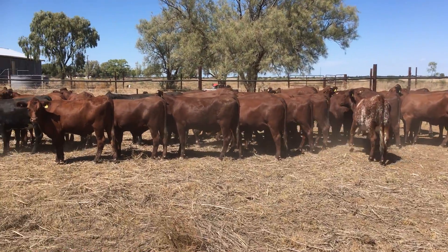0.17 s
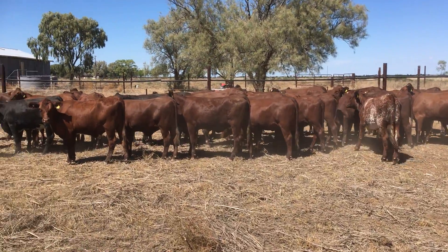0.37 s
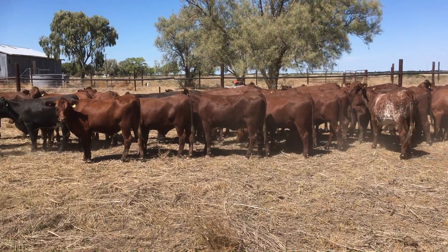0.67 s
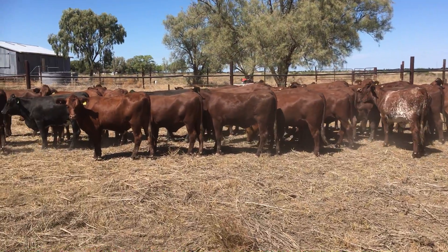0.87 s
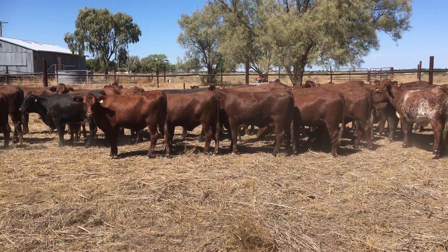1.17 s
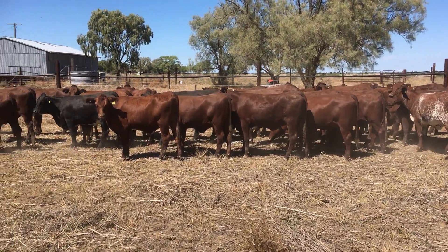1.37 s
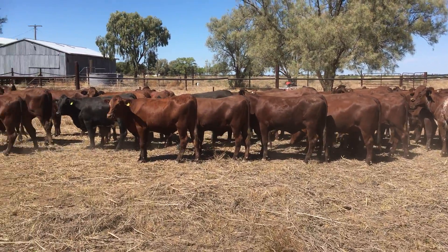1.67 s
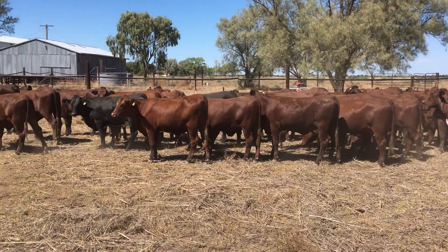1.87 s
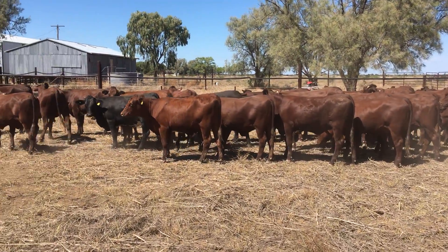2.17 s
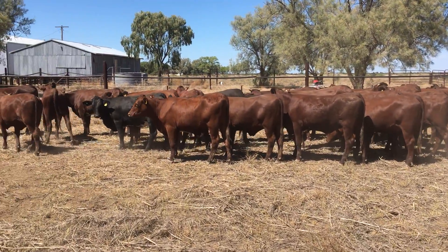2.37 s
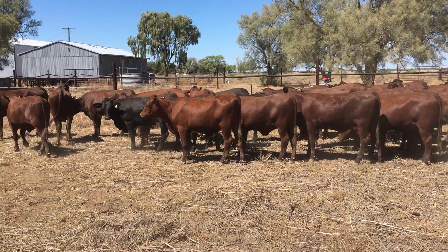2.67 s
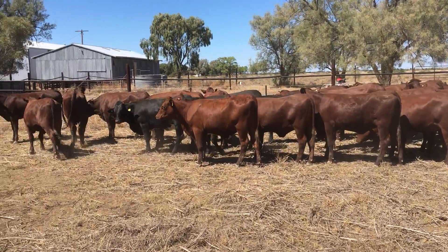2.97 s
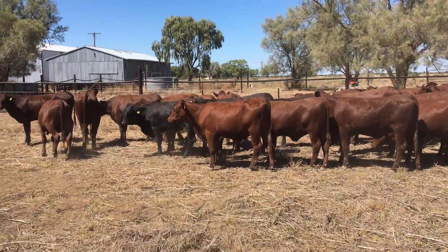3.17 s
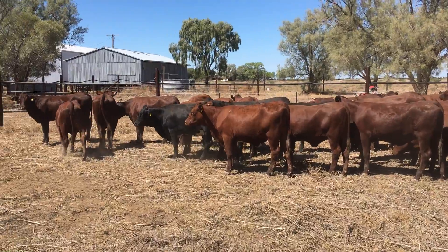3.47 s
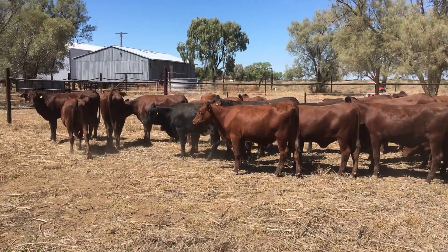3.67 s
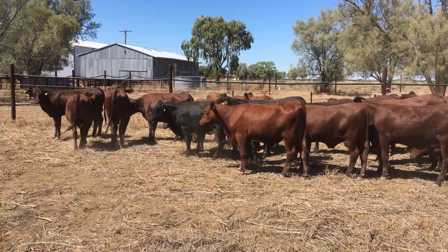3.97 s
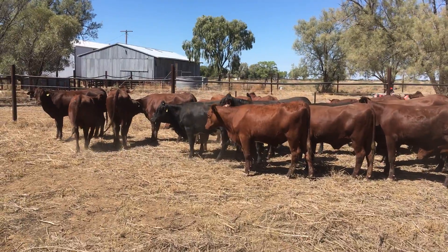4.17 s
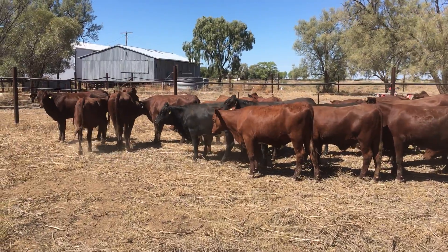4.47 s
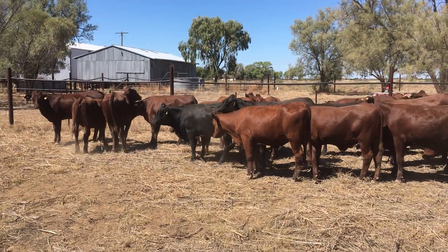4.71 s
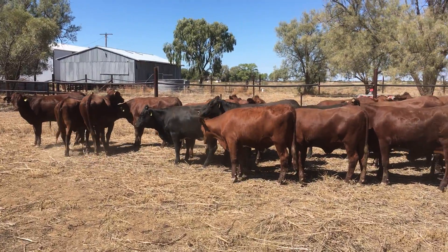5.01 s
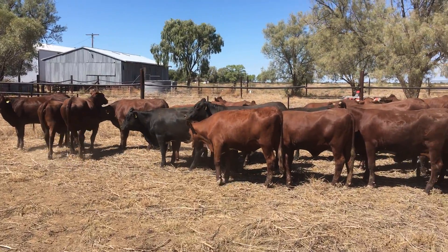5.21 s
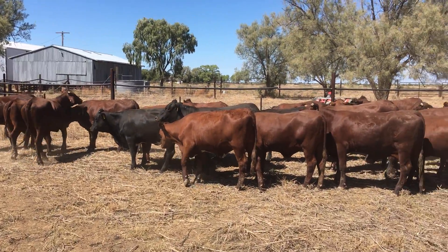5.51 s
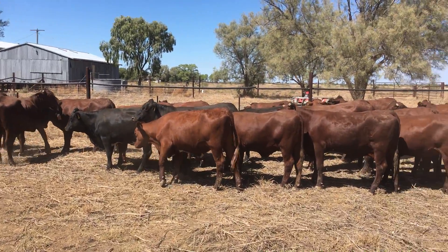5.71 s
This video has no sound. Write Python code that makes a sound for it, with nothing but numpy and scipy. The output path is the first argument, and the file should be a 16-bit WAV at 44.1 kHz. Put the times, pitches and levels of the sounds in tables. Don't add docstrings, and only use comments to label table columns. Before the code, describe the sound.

Dry straw crunches and crackles under shuffling feet and hooves in an open cattle yard, with sharp snaps, faint thuds and low wind rumble.

```python
import sys
import numpy as np
from scipy import signal
from scipy.fft import rfft, irfft, next_fast_len
from scipy.io import wavfile
from scipy.ndimage import uniform_filter1d, map_coordinates

SR = 44100
rng = np.random.default_rng(int(sys.argv[2]) if len(sys.argv) > 2 else 0)


def ratio(d):
    e = np.asarray(d, float) / 20
    return 10 ** e


def wav_out(sig):
    wavfile.write(sys.argv[1], SR, np.round(np.clip(np.atleast_2d(sig).T, -1, 1) * 32767).astype(np.int16))


N = 257974

# time of the peak in seconds, peak level in dB, pitch in Hz.
HOOF_THUDS = [(0.082, -41.5, 260), (0.45, -43.5, 290), (1.06, -50, 250), (1.36, -49, 170),
              (2.105, -44.5, 220), (2.223, -46, 268), (2.42, -41, 201), (2.483, -43, 214),
              (2.626, -48, 176), (2.887, -48.5, 205), (3.26, -47, 230), (3.403, -45.5, 290),
              (3.67, -50, 250), (4.12, -51, 200), (4.8, -50, 250), (5.38, -46.5, 150), (3.496, -48.5, 325),
              (5.113, -44, 190), (5.278, -47, 219), (5.594, -46, 163), (5.797, -58, 180)]
# time in seconds, chaff level in dB.
HERD_MILLING = [(0.0, -66.5), (2.04, -67.5), (2.18, -65.5), (2.43, -60.5), (2.56, -67), (3.11, -68.5),
                (3.32, -64), (3.73, -71), (4.27, -65), (4.59, -70.5), (5.08, -68.5), (5.85, -72)]


def unit(x):
    return x / np.sqrt(np.mean(x ** 2) + 1e-20)


def herd_level():
    s, db = np.transpose(HERD_MILLING)
    return np.interp(np.arange(N) / SR, s, db)


def wobble(rate):
    knots = rng.standard_normal(int(N * rate / SR) + 4)
    return map_coordinates(knots, [np.arange(N) * rate / SR])


def coloured(x, spectrum):
    m = next_fast_len(N + 8192)
    f, db = np.transpose(spectrum)
    gain = ratio(np.interp(np.log(np.fft.rfftfreq(m, 1 / SR) + 1), np.log(f), db, -120, -120))
    return unit(irfft(rfft(x, m) * gain, m)[:N])


def placed(s, waves):
    first = np.clip(np.round(s * SR).astype(int), 0, N)
    at = first[:, None] + np.arange(waves.shape[1])
    return np.bincount(at.ravel(), waves.ravel(), N + waves.shape[1] + 1)[:N]


def swells(s, db, rise_s, fall_s, floor_db):
    pointed = 1.9
    grid = np.arange(0, N + 64, 64)
    late = grid / SR - s[:, None]
    side_s = np.where(late < 0, rise_s[:, None], fall_s[:, None])
    bells = db[:, None] - 10 * np.abs(late / side_s) ** pointed
    total_db = 10 * np.log10(ratio(2 * bells).sum(axis=0) + ratio(2 * floor_db))
    return np.interp(np.arange(N), grid, total_db)


def hoof_falls(over_db):
    thud_s = 0.037
    s, db, _ = np.transpose(HOOF_THUDS)
    return ratio(swells(s, db + over_db, thud_s / 2 + 0 * s, thud_s + 0 * s, -120))


def clean_breaks(count, spread_db):
    u = rng.random((count, 3))
    side = np.sign(u[:, 1:2] - 0.5)
    return unit(placed(u[:, 0] * N / SR, side * ratio(-spread_db * np.log(u[:, 2:] + 0.013))))


def breaks(s, db, hz, cycles, size):
    turns = hz[:, None] * np.arange(size) / SR
    swing = np.sin(2 * np.pi * turns) * np.exp(-turns / cycles)
    return placed(s, ratio(db)[:, None] * swing)


def crackle(count, size, low_hz, high_hz, cycles, spread_db, clump_db, hiss_db, ticks, spectrum):
    u = rng.random((count, 3))
    hz = low_hz + (high_hz - low_hz) * u[:, 1]
    db = -spread_db * np.log(u[:, 2] + 6e-3)
    grains = breaks(u[:, 0] * N / SR, db, hz, cycles, size)
    grains = np.diff(grains, prepend=0) * ratio(clump_db * wobble(45))
    hiss = ratio(hiss_db) * rng.standard_normal(N)
    return coloured(unit(grains) + hiss + ticks, spectrum)


def straw():
    # time of most weight in seconds, fine stems level in dB,
    # release to -10 dB in seconds, thick stems over fine ones in dB.
    steps = [(0.047, -49.5, 0.3, -8), (0.245, -40, 0.13, -20), (0.441, -44, 0.08, -18),
             (0.595, -47, 0.39, -12.5), (0.716, -37.0, 0.014, -17.5), (0.895, -46, 0.2, -14.5),
             (1.101, -41.5, 0.07, -14.5), (1.224, -40.5, 0.0554, -21.5), (1.356, -45.5, 0.06, -17),
             (1.599, -46, 0.296, -15), (1.832, -51.5, 0.12, -18), (2.103, -44.5, 0.13, -13),
             (2.242, -43, 0.08, -18), (2.46, -45.5, 0.1153, -13.5), (2.589, -44.5, 0.04, -15.5),
             (2.69, -45.5, 0.05, -20), (2.846, -45.5, 0.11, -13), (3.273, -43, 0.16, -14.5),
             (3.535, -51.5, 0.07, -15), (3.69, -54, 0.57, -11.5), (4.073, -41, 0.106, -17),
             (4.39, -54, 0.14, -15), (4.546, -49.5, 0.031, -8.5), (4.774, -51.5, 0.08, -16.5),
             (4.919, -44, 0.063, -14.5), (5.163, -54, 0.14, -12), (5.32, -42.5, 0.061, -22),
             (5.459, -45.5, 0.033, -11.5), (5.536, -55.5, 0.2, -13), (5.832, -47.5, 0.113, -17.5)]
    # time of the peak in seconds, thick stems level in dB,
    # release to -10 dB in seconds.
    scuffs = [(0.075, -60, 0.08), (1.122, -60, .025), (2.085, -57.5, 0.12), (2.78, -55, -0.03),
              (3.225, -59, 0), (3.665, -65, .03), (4.075, -62, .04), (4.705, -63, .04), (4.8, -64, 0.3),
              (4.885, -60, .07), (5.09, -62, .03), (5.17, -64, 0), (5.43, -57, .045), (5.525, -62.5, 0.06)]
    # frequency in Hz, density in dB per Hz.
    fine_tone = [(3500, -18), (4900, -11), (6000, -3.5), (7700, -5.5), (9000, -1.5), (10300, -4),
                 (11500, -1.5), (16500, -1.5)]
    # frequency in Hz, density in dB per Hz.
    thick_tone = [(1200, -6), (2000, -2), (3200, -0.5), (4500, -3.5), (6000, -14.5), (9000, -1)]
    # frequency in Hz, density in dB per Hz.
    chaff_tone = [(200, -32), (400, -1), (1000, -0.5), (1800, -8), (2600, -15), (4000, -50)]
    press_over_release = 1.39
    catch_s, scuff_fine_db = 0.0075, 9
    far_fine_db, far_thick_db = -57, -68.5
    chaff_step_db, chaff_follows = -70, 0.7

    step_s, step_db, release_s, weight_db = np.transpose(steps)
    scuff_s, scuff_db, drag_s = np.transpose(scuffs)
    s = np.r_[step_s, scuff_s]
    rise_s = np.r_[press_over_release * release_s, catch_s + 0 * drag_s]
    fall_s = np.r_[release_s, drag_s]
    fine_db = swells(s, np.r_[step_db, scuff_db + scuff_fine_db], rise_s, fall_s, far_fine_db)
    thick_db = swells(s, np.r_[step_db + weight_db, scuff_db], rise_s, fall_s, far_thick_db)

    step_chaff = ratio(chaff_step_db + chaff_follows * (thick_db + 60.5))
    chaff_gain = np.hypot(ratio(herd_level() - 1.5), step_chaff)
    chaff_gain = np.hypot(chaff_gain, hoof_falls(-18))

    shuffle, scuff = wobble(24.524), wobble(15)
    ticks = clean_breaks(count=1500, spread_db=5.0)
    fine = crackle(count=24000, size=48, low_hz=5160, high_hz=17000, cycles=2.8, spread_db=4.0,
                   clump_db=2.5, hiss_db=1.0, ticks=ratio(-7.5) * ticks, spectrum=fine_tone)
    thick = crackle(count=9000, size=96, low_hz=2386, high_hz=7130, cycles=2.4, spread_db=3.0,
                    clump_db=0.7, hiss_db=2.0, ticks=ratio(-11) * ticks, spectrum=thick_tone)
    chaff = crackle(count=3000, size=256, low_hz=824, high_hz=3440, cycles=1.4, spread_db=3.0,
                    clump_db=2.8, hiss_db=7.5, ticks=ratio(3.5) * ticks, spectrum=chaff_tone)
    fine = ratio(fine_db + 0.5 + 0.49 * shuffle + 0.4 * scuff) * fine
    thick = ratio(thick_db + 1.15 * shuffle + 0.33 * scuff) * thick
    chaff = chaff_gain * ratio(0.8 * shuffle + 0.83 * scuff) * chaff
    return fine + thick + chaff


def wind():
    # time in seconds, rumble level in dB, length to -10 dB in seconds.
    gusts = [(0.126, -58.5, 0.125), (0.298, -63.0, -0.2), (0.587, -56.5, 0.06), (0.743, -52, 0.04),
             (0.93, -57.5, 0.104), (1.111, -59, 0.041), (1.43, -61, 0.06), (1.681, -59, 0.062),
             (1.823, -55, 0.07), (2.075, -64.5, 0.4), (2.449, -60.5, 0.103), (2.57, -55, 0.04),
             (2.66, -58, 0.105), (3.213, -62.5, 0.04), (3.725, -64.5, 0.2), (3.927, -62.3, 0.1),
             (4.122, -58, 0.045), (4.371, -61.5, 0.222), (4.708, -66, 0.1), (4.991, -67, 0.151),
             (5.15, -58.5, 0.15), (5.331, -64.3, 0.05), (5.602, -61, 0.1), (5.775, -62.5, 0.2)]
    # frequency in Hz, density in dB per Hz.
    rumble_tone = [(15, -46), (30, -5.5), (48, -0.5), (75, -0.5), (110, -9.5), (180, -21)]
    # frequency in Hz, density in dB per Hz.
    flutter_tone = [(60, -22), (110, 0), (170, -0.5), (300, -6.5), (450, -15.5), (700, -30)]
    calm_db = -71
    s, db, length_s = np.transpose(gusts)
    rumble_db = swells(s, db, length_s, length_s, calm_db)
    herd_db = herd_level()
    flutter_db = -65.5 + 0.57 * (herd_db - herd_db.mean())
    rumble = unit(ratio(0.9 * wobble(13)) * coloured(rng.standard_normal(N), rumble_tone))
    flutter = unit(ratio(2.45 * wobble(25)) * coloured(rng.standard_normal(N), flutter_tone))
    flutter_gain = np.hypot(ratio(flutter_db), hoof_falls(-16.5))
    return ratio(rumble_db + 0.2) * rumble + flutter_gain * flutter


def thuds():
    s, db, hz = np.transpose(HOOF_THUDS)[:, :, None]
    turns = hz * np.arange(1200) / SR
    swing = turns * np.exp(-turns / 0.58) * np.sin(2 * np.pi * turns)
    return placed(s[:, 0] - 0.844 / hz[:, 0], ratio(db + 7.5) * swing)


def knocks():
    # start in seconds, peak level in dB, pitch in Hz,
    # pitch fall in octaves.
    stalks = [(0.1167, -43.5, 1790, 1), (0.3966, -39.5, 1150, 1.5), (0.432, -45, 1300, 1.8),
              (0.5649, -36.5, 2200, 1.8), (0.571, -45, 1740, 2.3), (0.7203, -38, 2100, 1.4),
              (1.0623, -35, 2800, 2.2), (1.97, -40, 2000, 1.6), (2.2859, -58, 1500, 1.2),
              (2.4153, -38, 1500, 2.2), (2.4641, -47, 1270, 1.8), (2.4821, -32.5, 1100, 1.8),
              (2.496, -38, 1100, 1.96), (2.9306, -45, 890, 1.8), (3.157, -45, 795, .8),
              (3.3583, -45, 940, 2.5), (3.4009, -47, 600, 1.4), (3.4939, -46, 770, 2.2),
              (3.22, -43, 2600, .5), (3.6716, -35, 1800, 1.1), (4.4066, -45.5, 1840, 2),
              (4.5057, -42, 2200, 1.1), (4.5402, -44, 1570, 2.6), (4.765, -46, 880, 2.34),
              (4.7815, -41.5, 2040, 1.2), (4.7946, -43, 1390, 1.94), (5.1556, -41, 1050, 1.3),
              (5.181, -36, 2300, 0.61), (5.202, -47.5, 450, 1.03), (5.4856, -44, 2100, 2.1)]
    s, db, hz, fall = np.transpose(stalks)[:, :, None]
    t = np.arange(500) / SR
    pitch = 1.593 * hz * 2.0 ** (-fall * t / 0.00295)
    shape = np.exp(-t * hz / 2.37) * (1 - np.exp(-t / 0.00046))
    fray = uniform_filter1d(rng.standard_normal((len(s), len(t))), size=9) * 3
    phase = 2 * np.pi * np.cumsum(pitch, axis=1) / SR
    swing = np.sin(phase + 0.5 * fray) + 0.33 * fall * fray
    return placed(s[:, 0] - 0.62 / hz[:, 0], ratio(db - 0.5) * shape * swing)


def snaps():
    # start in seconds, peak level in dB, pitch in Hz, splinters in dB.
    cracking = [(0.2277, -11, 11400, -18), (0.2293, -17, 8200, -13), (0.4218, -22, 9600, -12),
                (0.6505, -23, 11800, -28), (0.7046, -18, 12700, -19), (0.717, -16, 12300, -11),
                (0.7195, -8, 10200, -21), (0.7761, -25, 12000, -18), (0.9541, -17, 12500, -26),
                (1.0621, -10, 11500, -22), (2.068, -26, 13500, -15), (0.7187, -19, 11000, -10),
                (2.2676, -27, 11100, -17), (2.4142, -22, 7700, -26), (2.48, -23, 8600, -16),
                (3.5298, -21, 11100, -20), (4.0179, -14, 9900, -21), (4.3965, -23, 10200, -26),
                (4.4142, -25, 9700, -24), (4.46, -26, 8500, -26), (4.54, -18, 6300, -13),
                (4.7458, -27, 8200, -16), (4.7821, -28, 6400, -26), (5.0908, -31, 7300, -14),
                (5.2404, -26, 10800, -24), (5.2819, -21, 12500, -20), (5.2935, -24, 13300, -16),
                (5.461, -27, 9500, -28), (5.4848, -27, 9500, -20), (5.5251, -24, 11000, -22)]
    # start in seconds,
    # peak level in dB, pitch in Hz.
    faint_cracking = [(0.3171, -25, 13300), (0.4475, -31, 5000), (0.5645, -28, 6600), (1.4766, -27, 11100),
                      (1.6657, -27, 10600), (2.1601, -26, 13600), (1.8146, -28, 12700), (1.851, -29, 12900),
                      (2.4197, -28, 8000), (2.4556, -27, 10300), (2.487, -28, 7800), (2.9293, -31, 8400),
                      (3.3713, -30, 12600), (3.72, -30, 7500), (4.1841, -30, 8000), (4.3188, -35, 7500),
                      (4.4439, -34, 6400), (4.5054, -36, 4500), (4.5335, -30, 11000), (4.7045, -30, 12700),
                      (4.8292, -33, 6300), (4.842, -28, 10000), (4.9439, -30, 7400), (2.702, -30, 6500),
                      (5.108, -30, 13100), (5.1544, -35, 6000), (5.3811, -28, 11700), (5.4775, -29, 8000),
                      (5.4474, -33, 6000), (0.5114, -32, 5500)]
    tick_splinter_db = -23
    one_cycle_hz, ring_grows = 5500, 1.23
    faint_cracking = np.c_[np.array(faint_cracking), np.full(len(faint_cracking), tick_splinter_db)]
    s, db, hz, splinter_db = np.vstack([cracking, faint_cracking]).T[:, :, None]
    cycles = (hz / one_cycle_hz) ** ring_grows
    t = np.arange(768) / SR
    turns = hz * t

    f = 1j * np.fft.rfftfreq(len(t), 1 / SR) / hz
    thin = (f / (f + 0.25 * cycles)) ** 3 + 0.035

    modes = 0
    for k in (-0.5, 0.03, 0.5):
        modes = modes + np.sin(2 * np.pi * (1 + k / np.maximum(cycles, 1.7)) * turns)
    shape = (1 - np.exp(-turns / 0.4)) * np.exp(-turns / (0.5 + 0.6 * cycles))
    crack = irfft(thin * rfft(modes * shape))
    crack = crack / np.abs(crack).max(axis=1, keepdims=True)

    chance = rng.standard_normal((len(s), 2, len(t)))
    fibres = irfft(thin * rfft(chance[:, 0]) * f / (f * f + 1.7 * f + 1))
    uneven_db = 5.86 * uniform_filter1d(chance[:, 1], size=16) * np.sqrt(16)
    fibres = unit(fibres) * ratio(uneven_db)
    fade = ratio(-60 * t / 0.028) * (1 - np.exp(-t / 0.00054))
    tail = ratio(splinter_db - 1.5) * fibres * fade
    return placed(s[:, 0] - 3 / SR, ratio(db) * (1.2 * crack + tail))


def scene():
    mono = straw() + wind() + thuds() + knocks() + snaps()
    return np.tile(mono, (2, 1))


def top_cut(x):
    return signal.sosfilt(signal.butter(12, 16870, fs=SR, output="sos"), x)


def record(dry):
    top_hz = 15800
    m = next_fast_len(N + 8192)
    passed = np.fft.rfftfreq(m, 1 / SR) < top_hz
    mix = irfft(rfft(dry, m) * passed, m)[:, :N]
    return top_cut(mix)


dry = scene()
out = record(dry)
wav_out(out)
```